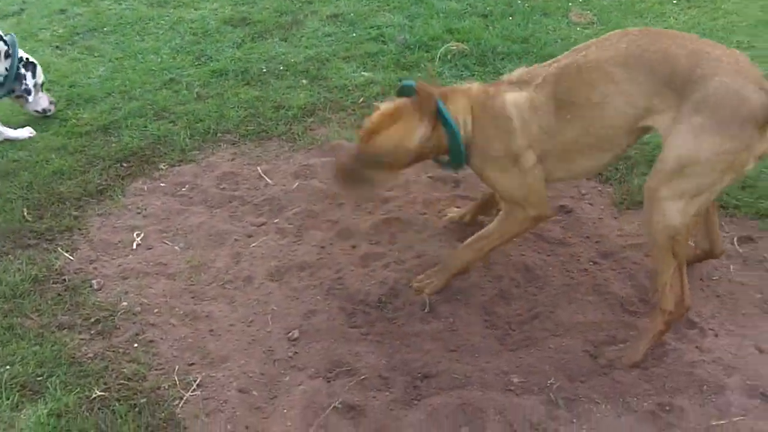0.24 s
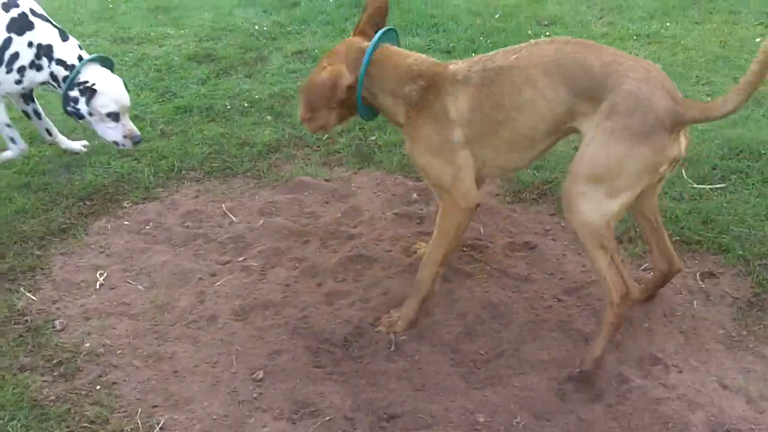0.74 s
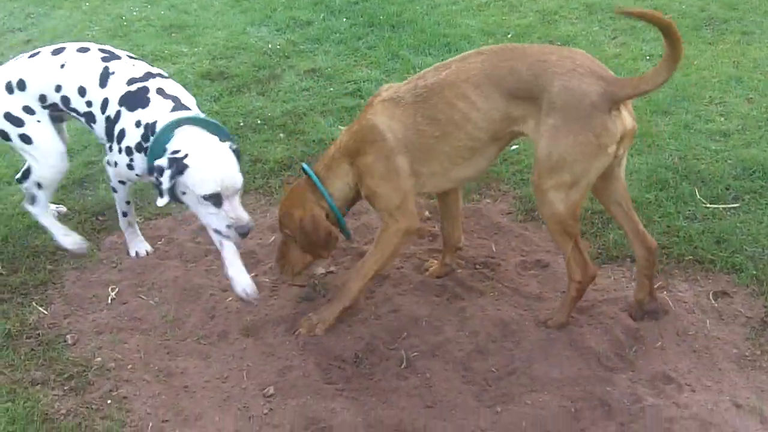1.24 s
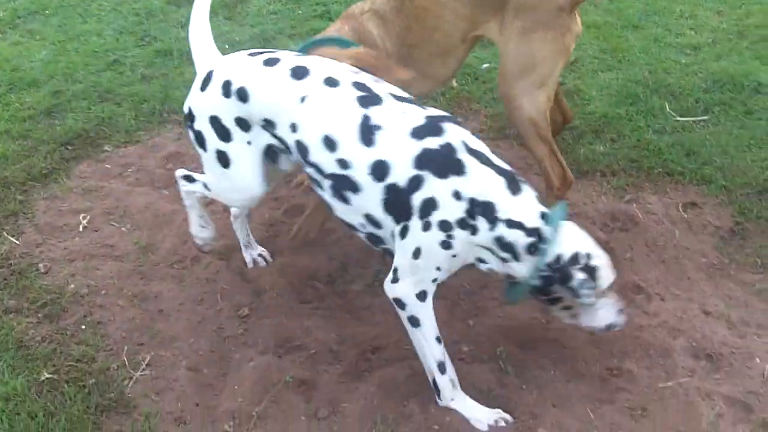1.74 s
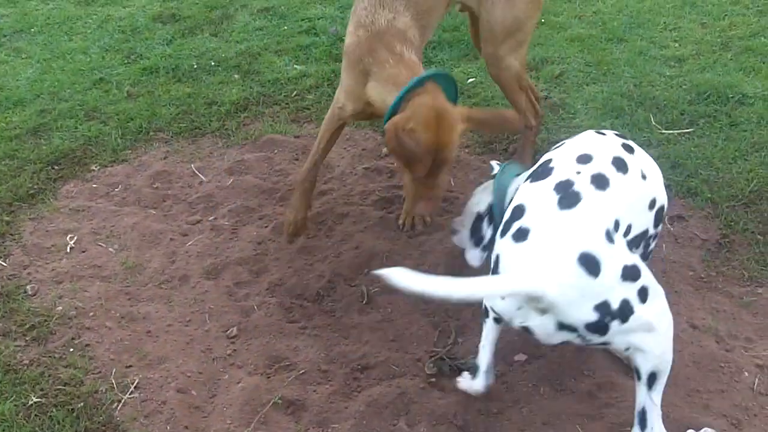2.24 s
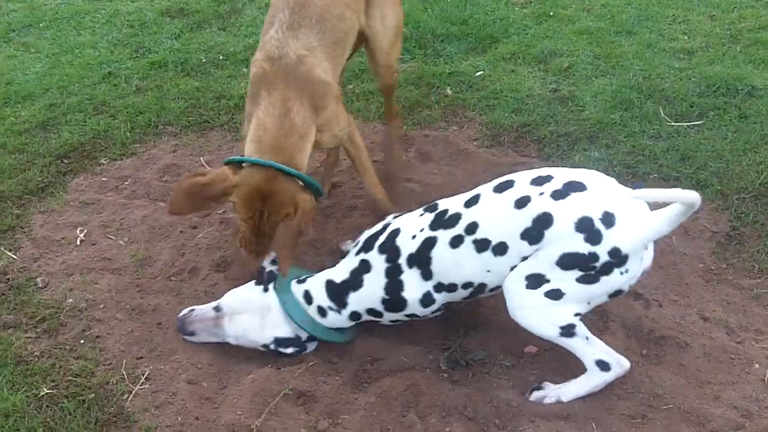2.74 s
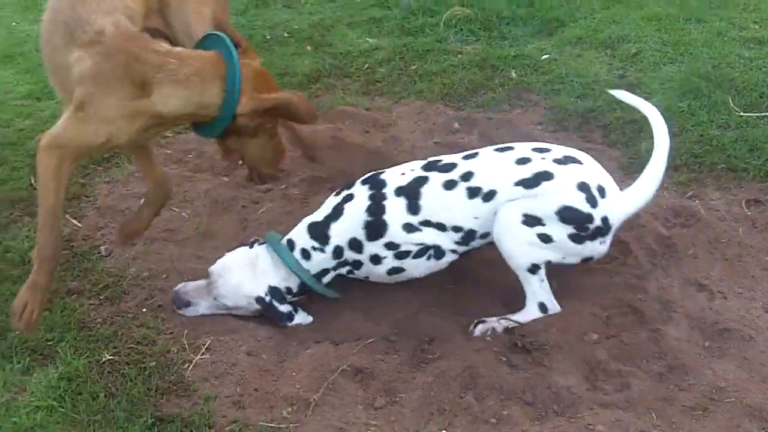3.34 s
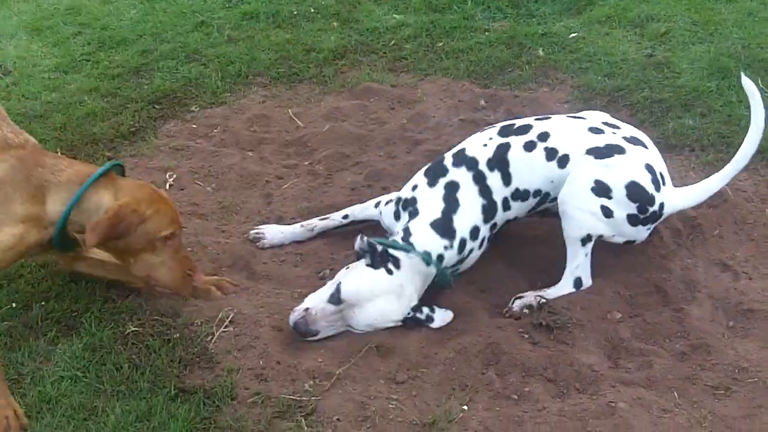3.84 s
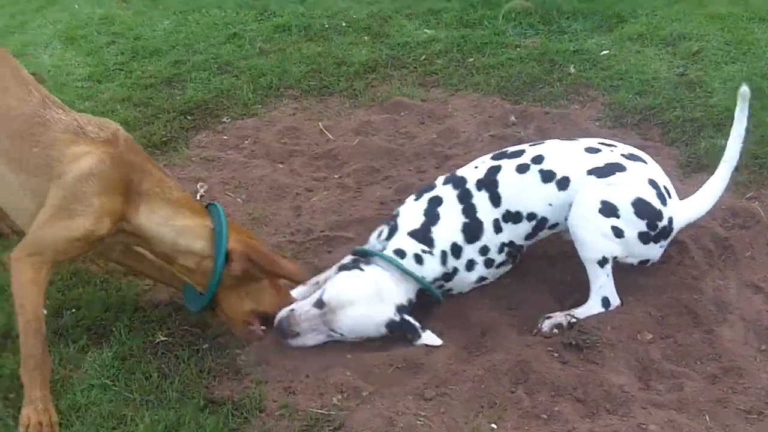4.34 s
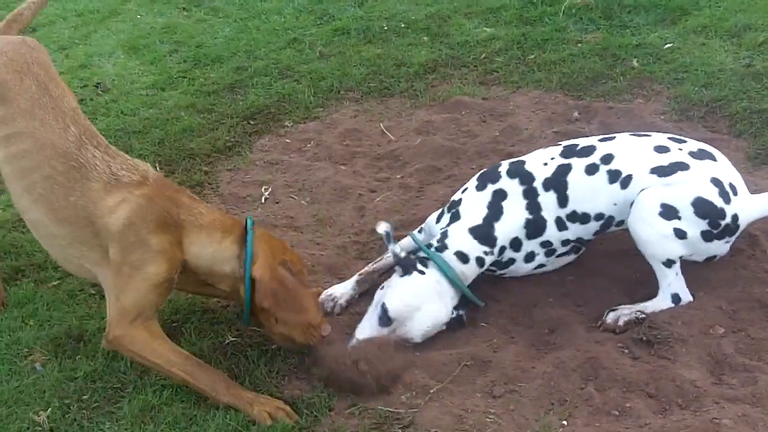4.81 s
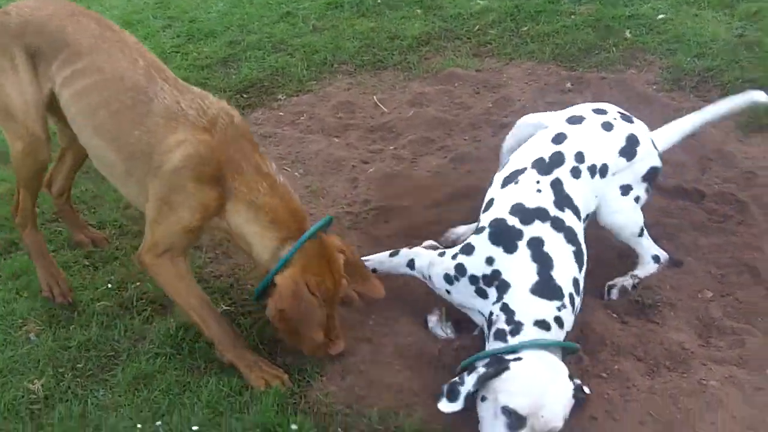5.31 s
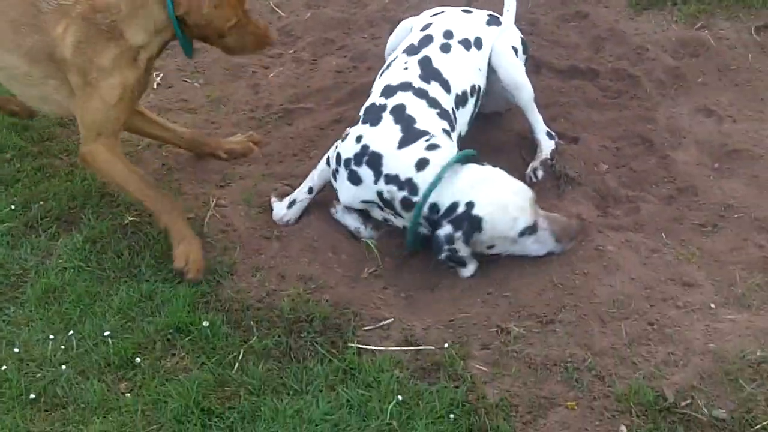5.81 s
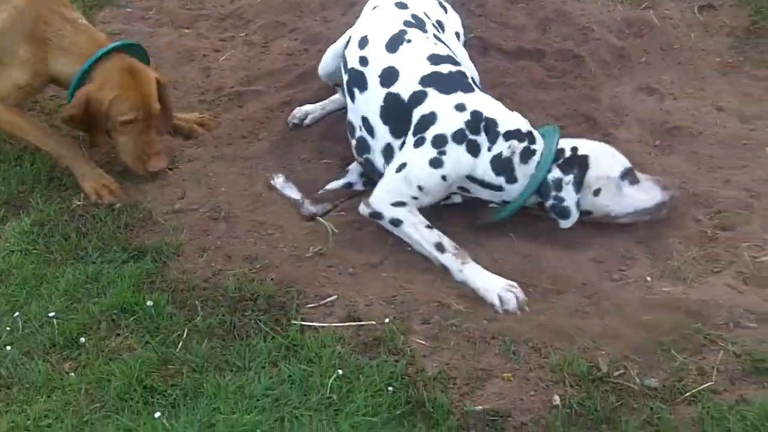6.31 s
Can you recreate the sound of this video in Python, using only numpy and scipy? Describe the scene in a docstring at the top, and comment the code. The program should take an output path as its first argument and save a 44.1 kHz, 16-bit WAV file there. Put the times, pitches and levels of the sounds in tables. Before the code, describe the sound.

Flapping ears clack hard for under a second, followed by sparse clicks, tooth snaps, faint scuffs and sniffs, with distant bird chirps and road noise.

```python
"""A dog shakes its head on bare earth: ears slap as short ringing ticks, swish as hiss and thump head modes.
Hollow knocks, during the head shake and again near the end, are damped tones. Claws then tick on grit, teeth
snap as banks of struck modes, and bodies scuff the soil as shaped noise. A distant bird gives a row of
dipping chirps, made as gliding sines; noses of the two dogs at play then whistle as resonant breath noise.
Throughout, a far road and a breeze are coloured noise, under hiss and a whine; a two-port microphone hears it."""
import sys
import numpy as np
from scipy import signal
from scipy.fft import rfft, irfft
from scipy.io import wavfile
from scipy.ndimage import uniform_filter1d

SR = 44100
rng = np.random.default_rng(int(sys.argv[2]) if len(sys.argv) > 2 else 0)


def generate_wav(signal):
    """Clip the signal to [-1, 1] and save it as 16-bit WAV at the path in sys.argv[1]."""
    frames = np.transpose(np.atleast_2d(signal))
    scaled = np.clip(frames, -1, 1) * 32767
    pcm = np.round(scaled).astype(np.int16)
    wavfile.write(sys.argv[1], SR, pcm)


N = 289604  # samples


def amp(db):
    """Decibel law: 20 dB is a factor of ten in amplitude."""
    return 10 ** (np.asarray(db) / 20)


def evened(x):
    """Root-mean-square normalisation: scale to rms 1."""
    return x / np.sqrt(np.mean(x ** 2) + 1e-20)


def read(points, hz):
    """Logarithmic frequency scale: interpolate a spectrum evenly per octave."""
    f, value = np.transpose(points)
    return np.interp(np.log(hz + 1), np.log(f + 1), value)


def curve(rows, column):
    """Linear interpolation: one column of a table as a curve over the whole scene."""
    rows = np.asarray(rows)
    return np.interp(np.arange(N) / SR, rows[:, 0], rows[:, column])


def add(mix, start_s, sound):
    """Superposition: pressures sum from the start time onward."""
    part = mix[round(start_s * SR):][:len(sound)]
    part += sound[:len(part)]


def resonate(x, hz, width_hz):
    """Resonance by frequency shifting: shift down, smooth, shift back, with gain 1 at the centre."""
    turn = np.exp(2j * np.pi * hz * np.arange(len(x)) / SR)
    r = np.exp(-np.pi * width_hz / SR)
    return 2 * (turn * signal.lfilter([1 - r], [1, -r], x / turn)).real


def noise(colour, size, patchy_db):
    """Coloured noise: random short-time spectra with drifting patches, rms 1."""
    hop = size // 4
    hz = np.fft.rfftfreq(size, 1 / SR)
    real, imaginary, patches = rng.standard_normal((N // hop + 5, len(hz), 3)).T
    patches = uniform_filter1d(patches, size=12, axis=0)  # smooth across frequency
    patches = evened(uniform_filter1d(patches, size=10, axis=1))  # and across time
    spectra = (real + 1j * imaginary) * amp(read(colour, hz)[:, None] + patchy_db * patches)
    return evened(signal.istft(spectra, nperseg=size, noverlap=size - hop)[1][:N])


# ears slapping the shaken head: (start_s, level_db, ring_hz, brightness_db, rustle_db, crack_hz)
SLAPS = [(0.0104, -22.5, 2640, -9, -18, 9000), (.044, -42, 3480, -2, -22, 6800),
         (0.051, -42, 3250, -2, -22, 7500), (.110, -50, 4100, 1, -16, 8500),
         (.1235, -52, 3500, 3, -14, 7500), (0.1295, -19, 2820, -13, -25, 6600),
         (.1662, -38, 3850, -5, -16, 6800), (.2307, -54, 3410, 7, -10, 9000),
         (.2355, -51, 3410, 9, -10, 9000), (0.244, -30.5, 2870, -8, -19, 8000),
         (.254, -51, 4200, 6, -18, 7800), (.3236, -48, 2480, 6, -20, 7500),
         (0.3312, -32.5, 2390, -11, -15, 6500), (.337, -48, 3000, 5, -20, 8000),
         (.341, -37, 2750, -4, -16, 9000), (.345, -42, 2900, -10, -12, 7500),
         (.4112, -50, 3270, 8, -22, 6300), (0.4186, -23, 2540, -25, -21, 7000),
         (.4235, -45, 4300, 0, -20, 6800), (.4297, -48, 3900, 11, -15, 8200),
         (0.5135, -16.5, 3900, 2.5, -29, 7300), (0.5162, -13, 2380, -5.5, -24.5, 6400),
         (.585, -46, 4230, 0, -16, 7500), (.609, -36, 2080, -12, -11, 7500),
         (.6148, -40, 2500, -4, -12, 7000), (0.618, -39, 4000, -4, -19, 8500),
         (.631, -44, 2500, -12, -10, 7000), (0.645, -28.5, 4040, -6, -19, 5900),
         (0.7167, -28.5, 2380, -21, -6, 6500), (.7205, -37.5, 2700, -15, -10, 7500),
         (.726, -54, 3000, 1, -12, 9000), (.739, -40, 1950, -22, -14, 7000),
         (.4045, -56, 4000, 8, -20, 8000), (.45, -52, 3000, -4, -16, 7500), (.46, -61, 4000, 4, -16, 8500),
         (.858, -54, 3500, -2, -16, 8000), (.77, -56, 4600, 7, -20, 7000),
         (.7998, -40.5, 2700, -18, -14, 6500), (.817, -41, 2300, -2, -20, 7000),
         (0.8327, -39, 3740, -4, -19, 9000)]
# claws on grit: (start_s, level_db, brightness_db)
CLAWS = [(1.0287, -55, 6), (1.438, -63, -1), (2.162, -44, -2), (2.7275, -62, 4), (2.964, -61, 3),
         (3.092, -60, 6), (3.113, -55, -6), (3.358, -55, -6), (3.385, -55, -6), (3.547, -64, 8),
         (3.595, -60, 3), (3.861, -59, 14.5), (3.8935, -61, 8), (4.2915, -56, 1), (4.374, -57, 3),
         (4.3867, -49, -7), (4.402, -62, 6), (4.468, -64, 8), (4.551, -65, 6), (4.5735, -58, 3),
         (5.11, -63, 8), (5.391, -58, 0), (5.409, -62, 0), (5.508, -62, 2), (6.0066, -54, 0),
         (6.161, -65, 10), (6.217, -58, 0), (6.2376, -59, 2), (6.345, -47.5, 4.5)]
CLAW_HZ, CLAW_RUSTLE_DB, CLAW_CRACK_HZ = 3500, -14, 7000
RUSTLE_T60_S = 0.018  # limit for a weak rustle; a strong one lasts longer


def tick(level_db, ring_hz, bright_db, rustle_db, crack_hz):
    """Impulse response: a sharp edge and a dying rustle excite a short ring and a bright crack."""
    t = np.arange(2000) / SR
    t60 = RUSTLE_T60_S * (1 + amp(rustle_db))
    edge = t == 0
    blows = amp(rustle_db - 60 * t / t60) * rng.standard_normal(len(t)) + edge
    ring = resonate(resonate(blows, ring_hz, 0.34 * ring_hz), ring_hz, 1.3 * ring_hz)
    crack = resonate(resonate(blows, crack_hz, 0.62 * crack_hz), crack_hz, 0.62 * crack_hz)
    ring, crack = ring / abs(ring).max(), crack / abs(crack).max()
    return -amp(level_db) * (ring + amp(bright_db) * crack)


# hollow knocks of cheek or paw: (start_s, level_db, pitch_hz, rise_s, t60_s)
KNOCKS = [(.331, -29.5, 816, 0.0018, .02), (.7195, -29.5, 440, .003, .014),
          (.7187, -26, 665, 0.0047, 0.017), (.7225, -36, 550, .002, .012),
          (6.115, -24.5, 750, 0.0075, 0.03), (6.208, -21.5, 753, 0.0082, 0.018)]


def knock(level_db, pitch_hz, rise_s, t60_s):
    """Damped oscillation: a hollow tone swells, then dies exponentially."""
    t = np.arange(4000) / SR
    swell = np.sin(np.pi / 2 * np.minimum(t / rise_s, 1)) ** 2
    decay = amp(level_db - 60 * np.maximum(t - rise_s, 0) / t60_s)
    return -decay * swell * np.sin(2 * np.pi * pitch_hz * t)


# head thump at the hardest slaps, a weak inverted push, then the full thump:
# (start_s, signed_strength as a factor)
THUMPS = [(.5137, -.2), (.5146, 1)]
# modes of the head, before that strength: (level_db, pitch_hz, rise_s, t60_s)
HEAD = [(-17.5, 185, 0.00088, 0.021), (-20, 437, 0.0011, 0.012), (-10, 780, 0.0021, 0.011),
        (-26, 1550, 0.0028, 0.015)]


def thump(strength):
    """Modal superposition: the damped modes of the head sound together."""
    return strength * sum(knock(*mode) for mode in HEAD)


# teeth meeting: (start_s, level_db, brightness_db per octave, top_modes_db)
SNAPS = [(1.1576, -24.5, 10, 0.5), (1.8977, -15.5, -1, -14), (4.6596, -26, 11.5, -1),
         (6.1389, -12.5, -3.5, 1)]
# modes of the teeth, relative to the snap: (pitch_hz, level_db, t60_s, first_swing as a signed factor)
TEETH = [(1110, -12.5, .008, -0.88), (1760, 1, 0.012, 0.87), (2294, 1, 0.0073, -1.06),
         (3720, -13.5, 0.0064, -1.6), (4370, -8, 0.0048, 0.82), (6400, -13, 0.0053, 0.96),
         (7670, -13, 0.0044, -0.95), (9270, -13, 0.0036, 0.92), (12900, -32, .004, -1)]
TOP_HZ = 8500  # modes above this get the snap's top-mode level


def snap(level_db, bright_db, top_db):
    """Modal synthesis: enamel modes start at once, tilted in level about 2 kHz, over a dying noise."""
    t = np.arange(1500) / SR
    modes = np.zeros(len(t))
    for hz, mode_db, t60, swing in TEETH:
        start_db = mode_db + bright_db * np.log2(hz / 2000) + top_db * (hz > TOP_HZ)
        modes += swing * amp(start_db - 60 * t / t60) * np.sin(2 * np.pi * hz * t)
    closing = np.sin(np.pi / 2 * np.minimum(t / .0005, 1)) ** 2  # the teeth slide into contact
    tail = resonate(rng.standard_normal(len(t)), 4400, 6000) * amp(-22 - 60 * t / 0.019 + 1.14 * bright_db)
    return amp(level_db) * (modes + tail) * closing


# fur and paws over soil: (crest_s, level_db, rise_s, hold_s, fall_s, dull_part_db relative to the bright)
SCUFFS = [(1.66, -70.5, .12, 0, 0.12, 0.5), (2.2, -72, 0.17, 0, .08, 3), (2.98, -73, .03, 0.024, .03, -6),
          (3.13, -69, 0.055, 0.024, .04, -3), (3.362, -63, 0.06, .03, 0.065, 1),
          (3.47, -70, .02, .01, .08, 2), (3.6, -66.5, .008, .01, .02, -1),
          (3.803, -60.5, .008, 0, 0.015, -6), (3.895, -64.5, .015, 0.017, 0.035, -8),
          (4.375, -69, .01, 0.031, 0.015, 4), (4.58, -68, .015, 0, 0.014, 2),
          (4.71, -67, .02, .08, 0.03, -7), (4.84, -70, .02, 0.021, .07, -8),
          (5.15, -62, 0.014, .08, 0.096, -6), (5.5, -71, 0.12, 0, 0.18, 0),
          (5.768, -54.5, 0.04, 0.018, 0.032, 0.5), (6.04, -72.5, .05, .03, .05, -4),
          (6.238, -68, .007, .02, .07, 2.5), (6.383, -64, 0.065, .1, .05, 2)]
# fur rustling through the whole shake: (crest_s, level_db, rise_s, hold_s, fall_s, dull_part_db)
SHAKE = (0.4, -69, 0.1, 0.32, 0.34, 0)
# ears swishing through the air: (crest_s, level_db)
SWISHES = [(.014, -67), (.085, -64), (.13, -60), (.17, -64), (.24, -59), (.338, -60), (.385, -68),
           (.425, -68), (.5, -64), (.57, -64), (.615, -55), (.725, -59), (.8, -70)]
# shape of every swish: (rise_s, hold_s, fall_s, dull_part_db)
SWISH = (0.014, 0, 0.016, 0)
# spectrum of the dull soil hiss: (frequency_hz, density_db per Hz)
DULL_SOIL = [(1200, -42), (2000, 3), (3000, -2), (4400, 0), (5500, -8.5), (7000, -27)]
# spectrum of the bright soil hiss: (frequency_hz, density_db per Hz)
BRIGHT_SOIL = [(4500, -32), (5800, -0.5), (7000, 3), (9000, -8.5), (12000, -4), (15400, -17)]
STROKE_POINT = 1.1  # exponent of the stroke: 1 pointed, 2 rounded
GRIT_DB, GRIT_PER_S = -6, 1500  # single grains crackling, relative to the stroke


def grains(per_s, most):
    """Shot noise: sparse grains at random instants with random strengths."""
    return amp(4 * np.minimum(rng.exponential(1, N), most)) * (rng.random(N) < per_s / SR)


def scuffs():
    """Friction noise: each stroke swells a crumbly soil hiss and a crackle of grit."""
    t, power = np.arange(N) / SR, np.zeros((2, N))  # dull and bright
    swishes = [(s, db, *SWISH) for s, db in SWISHES]
    for s, db, rise, hold, fall, dull_db in [*swishes, SHAKE, *SCUFFS]:
        away = np.maximum(s - t, 0) / rise + np.maximum(t - s - hold, 0) / fall
        stroke = amp(db) * np.exp(-away ** STROKE_POINT)
        power += (stroke * amp([[dull_db], [0]])) ** 2
    crumbs = signal.lfilter([1], [1, -np.exp(-1 / (.001 * SR))], grains(500, 3))  # each dies with 1 ms
    grain = evened(1 + .35 * evened(crumbs))
    soil = np.array([noise(colour, size=256, patchy_db=1.3) for colour in (DULL_SOIL, BRIGHT_SOIL)])
    hits = grains(GRIT_PER_S, 3.5)
    grit = [amp(GRIT_DB) * evened(resonate(resonate(hits, hz, 0.83 * hz), hz, 0.83 * hz))
            for hz in (3600, 8000)]
    return (np.sqrt(power) * (grain * soil + grit)).sum(0)


# air whistling through a nose: (start_s, end_s, level_db before the fade, resonance_hz, width_hz)
SNIFFS = [(2.93, 3.45, -73, 6900, 450), (3.15, 3.75, -72, 7000, 900), (3.36, 3.58, -64, 4620, 200),
          (3.46, 3.5, -66, 3150, 350), (3.593, 3.7, -69, 3450, 400), (3.855, 3.91, -68, 3780, 250),
          (5.13, 5.343, -57, 4370, 800), (5.445, 5.56, -70, 4300, 700), (6.38, 6.45, -61, 4300, 800),
          (6.45, 6.5, -62, 3900, 500)]


def sniff(length_s, level_db, hz, width_hz):
    """Turbulence in a resonator: breath noise in one nasal resonance, strongest early and fading."""
    air = rng.standard_normal(round(length_s * SR))
    puff = signal.windows.tukey(len(air), .35) * amp(np.linspace(0, -12, len(air)))
    puff = puff * (1 + .1 * evened(uniform_filter1d(air, size=900)))  # uneven flow
    return amp(level_db) * evened(resonate(resonate(air, hz, width_hz), hz, width_hz)) * puff


# bird chirps: (lowest_point_s, level_db at that point before flutter, lowest_pitch_hz, half_length_s)
CHIRPS = [(1.742, -77, 4050, .034), (1.865, -73.5, 3950, .04), (1.995, -74.5, 4000, .034),
          (2.115, -73.5, 4050, .036), (2.252, -72, 4120, .034), (2.375, -71.5, 4080, .037),
          (2.502, -71.5, 4130, .034), (2.645, -74, 4130, .034)]


def chirp(level_db, lowest_hz, half_s, sweep_hz=1180, dip_db=3.0):
    """Frequency modulation: a rough sine falls, turns and climbs back, loudest around the turn."""
    u = np.arange(-half_s, half_s, 1 / SR) / half_s
    pitch = lowest_hz + sweep_hz * (np.sqrt(u ** 2 + .03) - np.sqrt(.03))
    flutter = 1 + .3 * evened(uniform_filter1d(rng.standard_normal(6000), size=120))[:len(u)]
    loudness = amp(level_db - dip_db * abs(u)) * flutter * signal.windows.tukey(len(u), .15)
    return loudness * np.sin(2 * np.pi * np.cumsum(pitch) / SR)


# course of the road: (time_s, drone_level_db, upper_hiss_level_db)
ROAD = [(0.0, -43, -41.5), (.4, -43, -42.5), (1.5, -43, -42.5), (2.7, -42.5, -42.5), (3.7, -40.5, -41.5),
        (5.2, -41.5, -41.5), (5.9, -40.5, -41.5), (6.57, -41, -40)]
# spectrum of the road: (frequency_hz, density_db per Hz)
ROAD_COLOUR = [(190, -40), (330, -21), (419, -17), (551, -4.5), (723, 0.5), (792, 0), (908, -0.5),
               (983, -5), (1340, -8), (2310, -24), (3940, -39.5), (4310, -40), (5000, -49.5), (6500, -79),
               (11000, -120)]
ROAD_SPLIT_HZ = 1050


def road():
    """Band splitting: one coloured noise is parted into drone and hiss, each with its own level."""
    traffic = noise(ROAD_COLOUR, size=1024, patchy_db=1.)
    drone = signal.sosfiltfilt(signal.butter(2, ROAD_SPLIT_HZ, fs=SR, output="sos"), traffic)
    return amp(curve(ROAD, 1)) * drone + amp(curve(ROAD, 2)) * (traffic - drone)


# course of the breeze: (time_s, level_db)
BREEZE = [(0.0, -34), (0.8, -36), (1.2, -37.5), (2.8, -37), (4.3, -37), (5.3, -35), (6.57, -36.5)]
# spectrum of the breeze: (frequency_hz, density_db per Hz)
BREEZE_COLOUR = [(2.9, -34), (5.0, -7), (16, 0.5), (22, -1.5), (44, 1), (65, -3.5), (115, -7), (136, -11),
                 (200, -16.5), (290, -25), (420, -31), (550, -46), (920, -120)]


def breeze():
    """Low-frequency turbulence: a rumbling noise rises and falls slowly."""
    return amp(curve(BREEZE, 1)) * noise(BREEZE_COLOUR, size=8192, patchy_db=0.4)


# spectrum of the steady hiss: (frequency_hz, density_db per Hz)
HISS_COLOUR = [(2500, -30), (4000, -15), (6000, -0.5), (8000, -4), (10500, -5), (12500, 5), (14000, -2.5),
               (15400, -15)]
HISS_DB = -71.5


def hiss():
    """Stationary noise: a steady treble hiss of fixed colour."""
    return amp(HISS_DB) * noise(HISS_COLOUR, size=512, patchy_db=0.5)


WHINE_HZ, WHINE_DB, WAVER_HZ = 7867, -83, 7  # mean pitch, rms level, rms waver of the pitch


def whine():
    """Random frequency modulation: a thin tone whose pitch wavers quickly."""
    pitch = WHINE_HZ + WAVER_HZ * evened(uniform_filter1d(rng.standard_normal(N), size=200))
    return amp(WHINE_DB) * np.sqrt(2) * np.sin(2 * np.pi * np.cumsum(pitch) / SR)


def scene():
    """Superposition: near sounds reach the ports unequally, far sounds reach both alike."""
    near = scuffs()
    for s, *columns in SLAPS:
        add(near, s, tick(*columns))
    for s, db, bright_db in CLAWS:
        add(near, s, tick(db, CLAW_HZ, bright_db, CLAW_RUSTLE_DB, CLAW_CRACK_HZ))
    for s, strength in THUMPS:
        add(near, s, thump(strength))
    for s, *columns in SNAPS:
        add(near, s, snap(*columns))
    for s, *columns in KNOCKS:
        add(near, s, knock(*columns))
    for start, end, *columns in SNIFFS:
        add(near, start, sniff(end - start, *columns))
    far = road() + breeze() + hiss() + whine()
    for s, *columns in CHIRPS:
        call = chirp(*columns)
        add(far, s - len(call) / 2 / SR, call)
    # the dogs reach the right port a tenth of a sample later and half a decibel louder
    later = np.roll(near, shift=1)
    right = near + .1 * (later - near)
    return far + np.array([amp(-.25) * near, amp(.25) * right])


# inequality of the ports: (frequency_hz, left_minus_right_db)
LEAN = [(15, -0.1), (35, 0.8), (70, 0), (150, -1), (1000, 0), (15000, 0)]
# spectrum of what the two ports do not share: (frequency_hz, density_db per Hz)
UNSHARED_COLOUR = [(5, -9), (16, 1), (35, 3), (70, 2), (140, -14), (270, -30), (560, -30), (850, -55),
                   (1200, -60), (3000, -45), (5500, -54), (7700, -36.5), (11000, -29.5), (14000, -37),
                   (15400, -55)]
# steady converter offset, rows left and right: (offset as a fraction of full scale)
OFFSET = [
    [.0289],
    [-.0126],
]
UNSHARED_DB = -69
NOTCH_HZ, NOTCH_WIDTH_HZ, NOTCH_DB = 5464, 990, -20  # port cancellation
SHELF_HZ, SHELF_DB = 11070, -9.5  # the capsule falls away above
EDGE_HZ = 15350  # band limit


def record(dry):
    """Linear filtering: notch, shelf and unequal ports, then opposed noise, band limit and offset."""
    hz = np.fft.rfftfreq(N, 1 / SR)
    detuning = 1j * (hz / NOTCH_HZ - NOTCH_HZ / (hz + 1)) * NOTCH_HZ / NOTCH_WIDTH_HZ
    notch = (detuning + amp(NOTCH_DB)) / (detuning + 1)
    shelf = amp(SHELF_DB / (1 + (SHELF_HZ / (hz + 1)) ** 20))
    unequal = amp(read(LEAN, hz) / 2 * np.array([[1], [-1]]))
    heard = irfft(rfft(dry) * notch * shelf * unequal, N)
    heard = heard + amp(UNSHARED_DB) * noise(UNSHARED_COLOUR, size=4096, patchy_db=3.5) * [[1], [-1]]
    low_pass = signal.firwin(511, EDGE_HZ, window=("kaiser", 9), fs=SR)
    return signal.oaconvolve(heard, low_pass[None], "same") + OFFSET


dry = scene()
out = record(dry)
generate_wav(out)
```